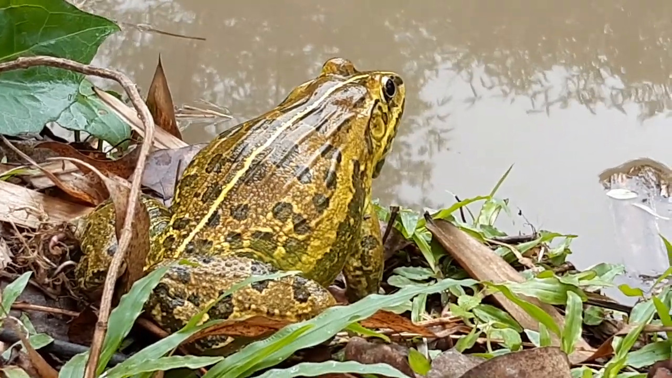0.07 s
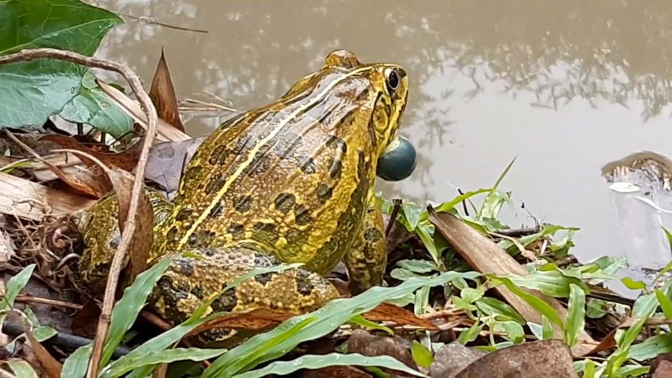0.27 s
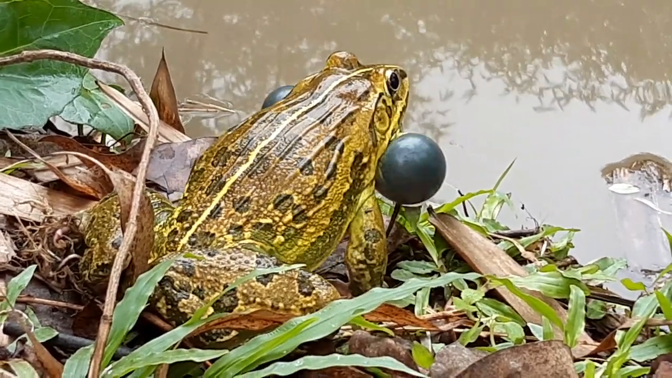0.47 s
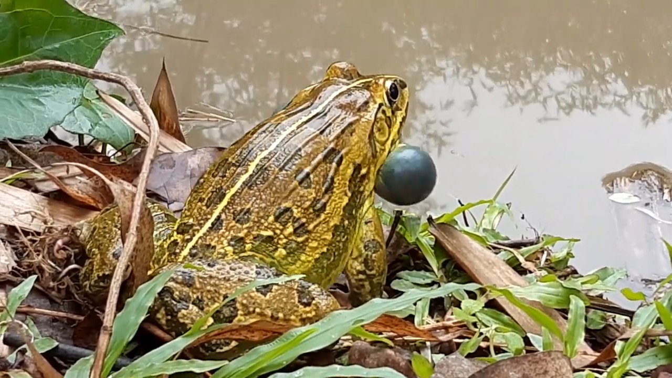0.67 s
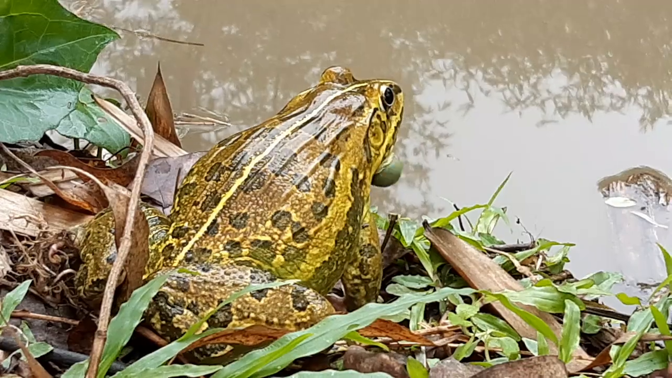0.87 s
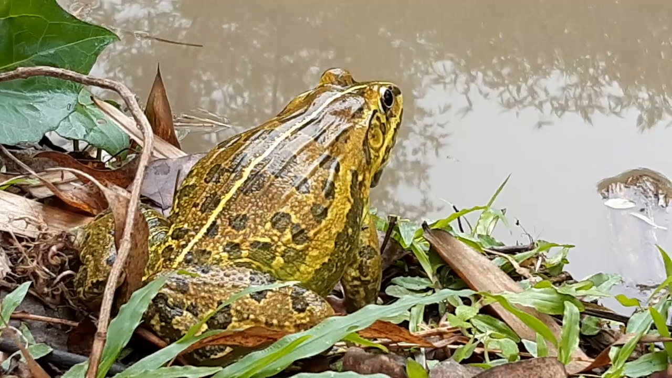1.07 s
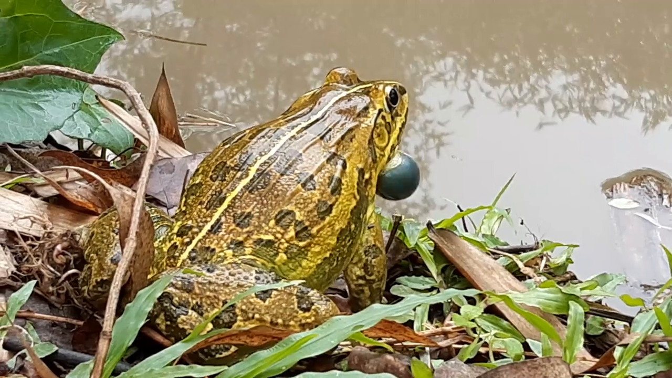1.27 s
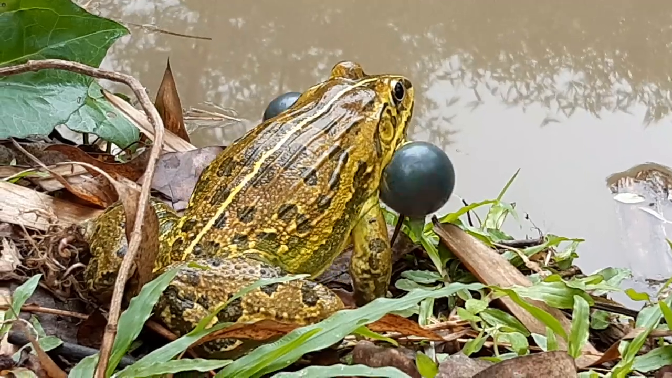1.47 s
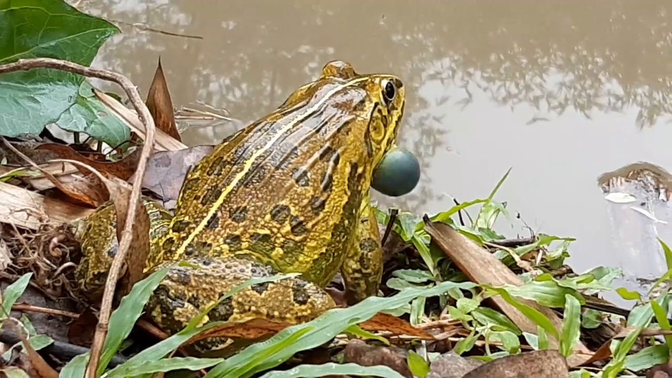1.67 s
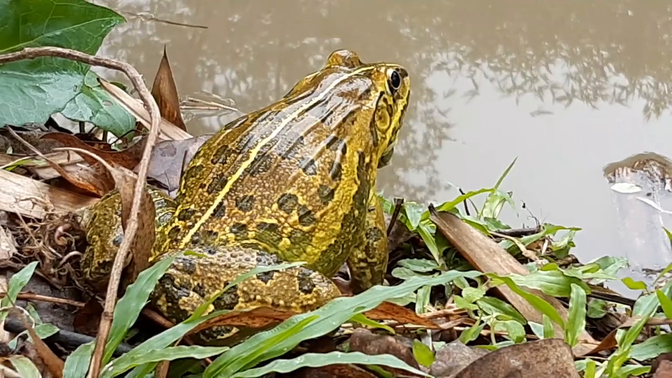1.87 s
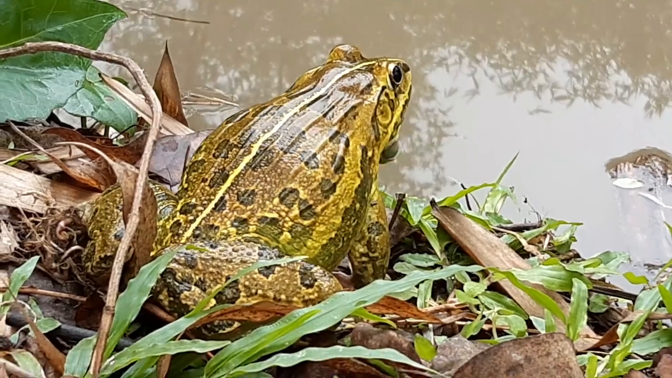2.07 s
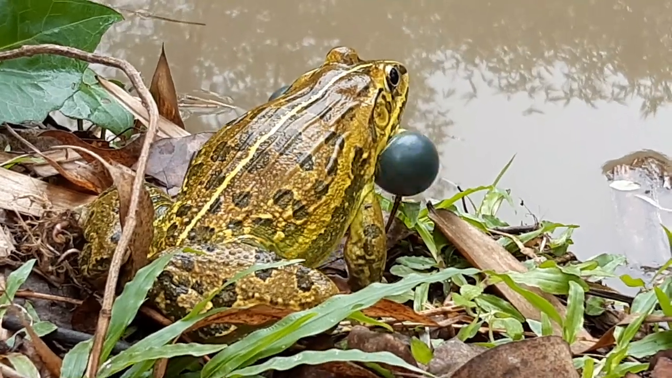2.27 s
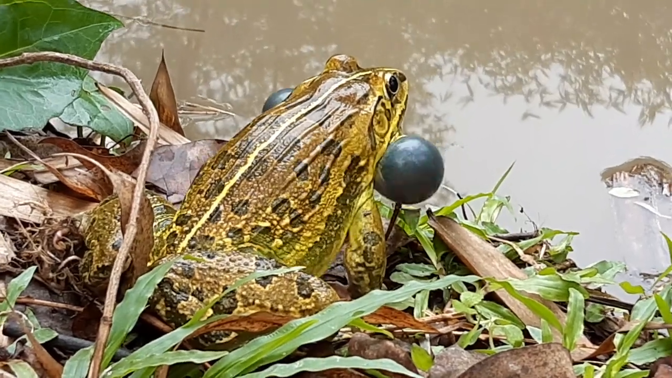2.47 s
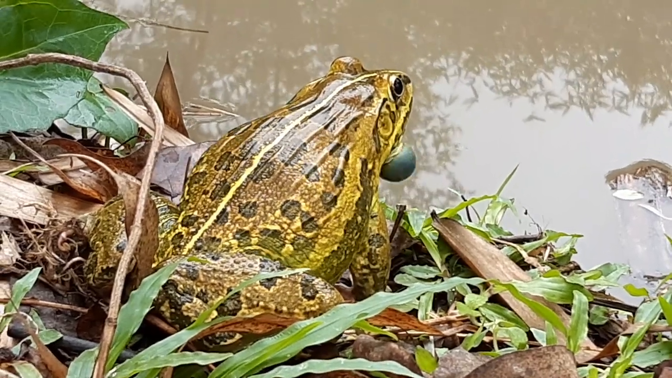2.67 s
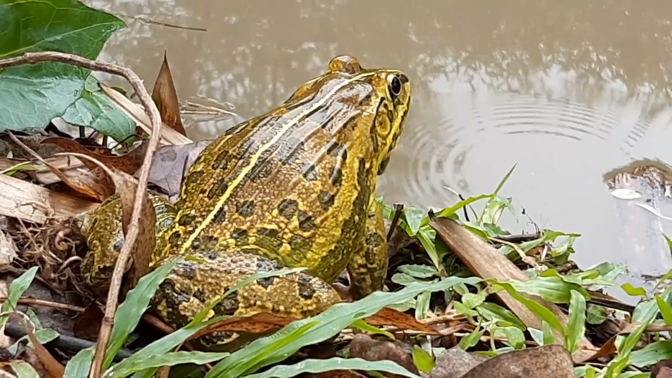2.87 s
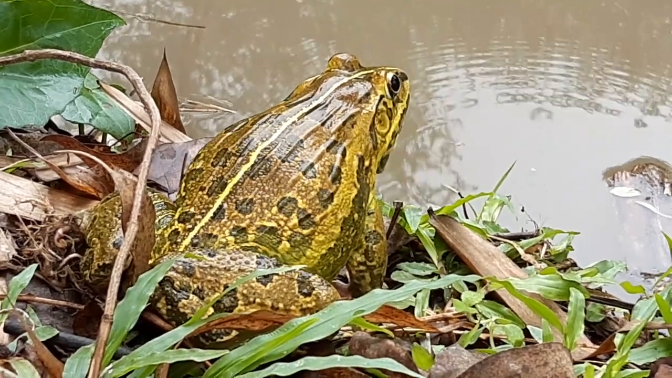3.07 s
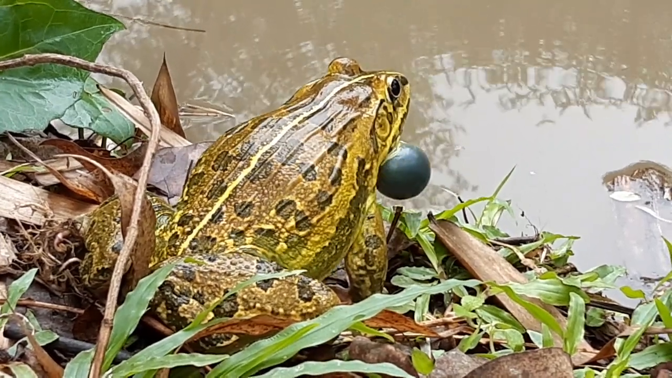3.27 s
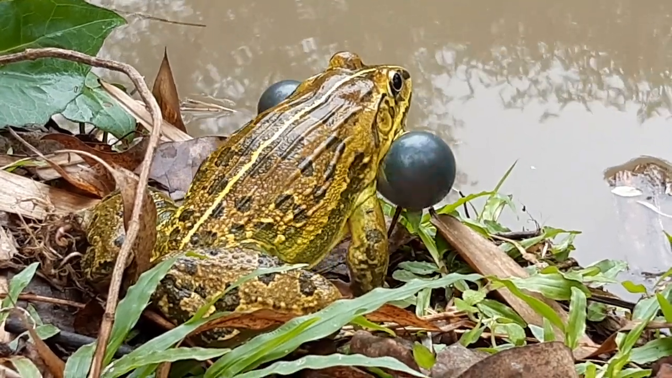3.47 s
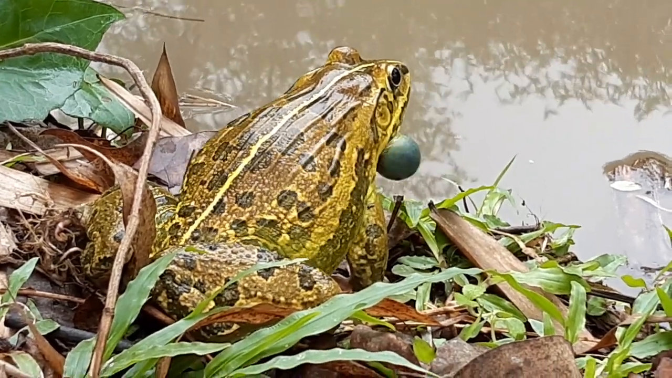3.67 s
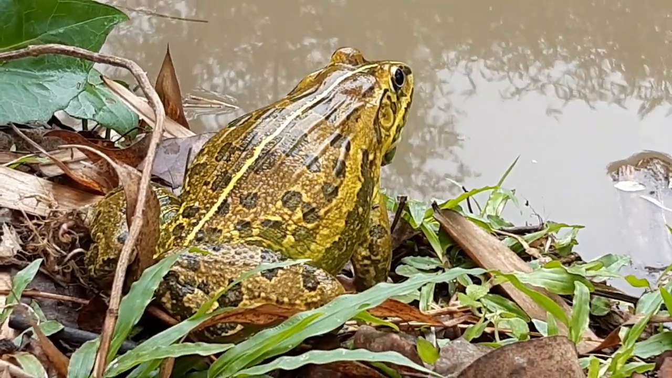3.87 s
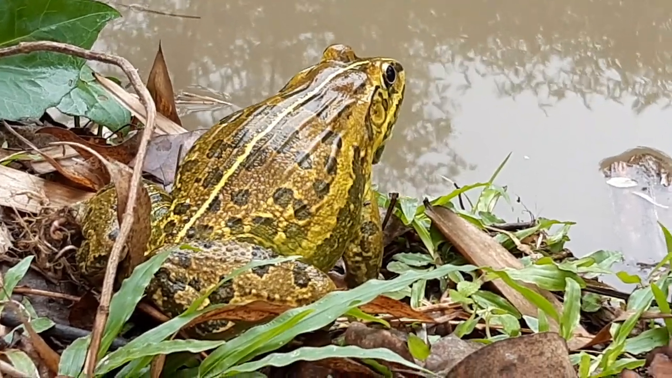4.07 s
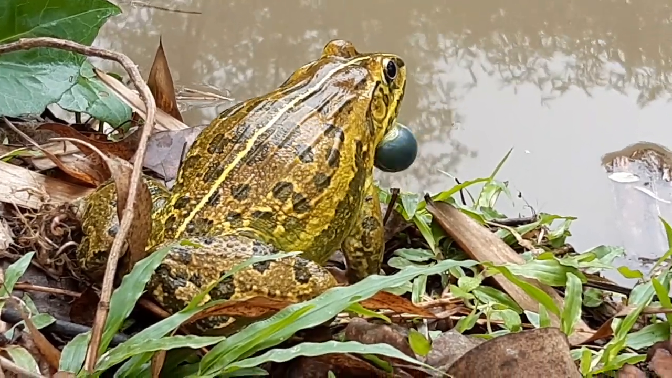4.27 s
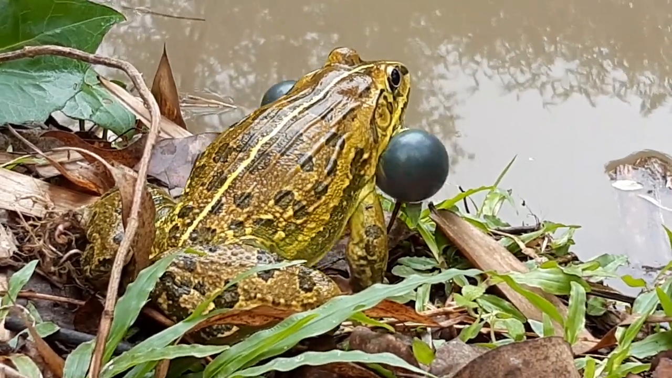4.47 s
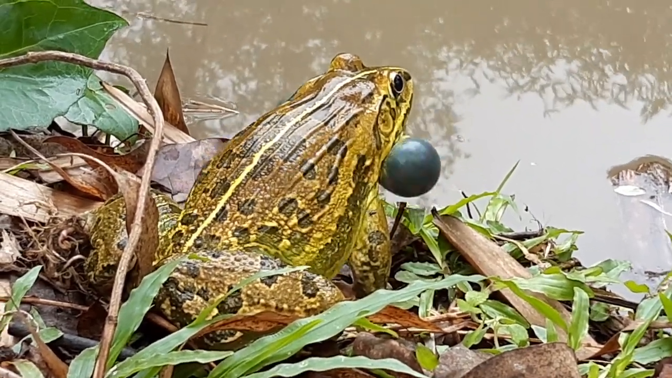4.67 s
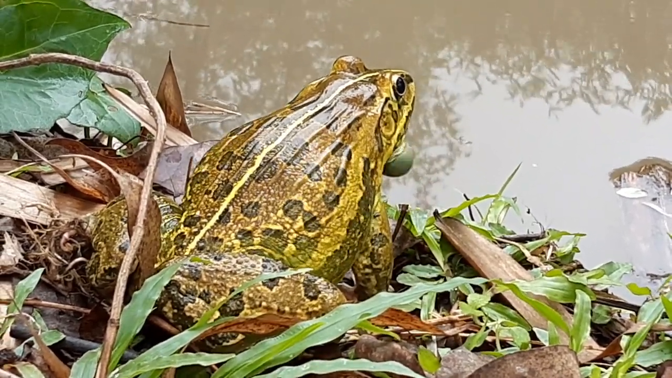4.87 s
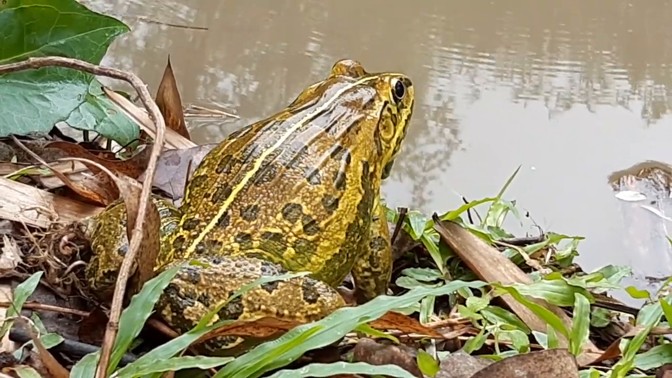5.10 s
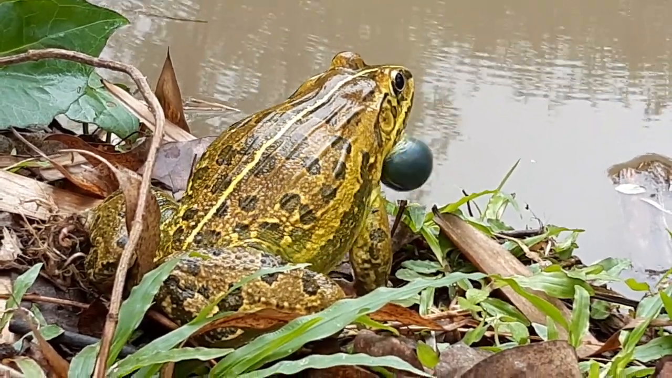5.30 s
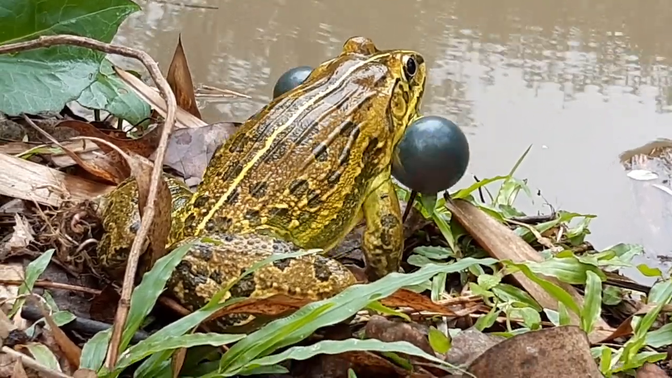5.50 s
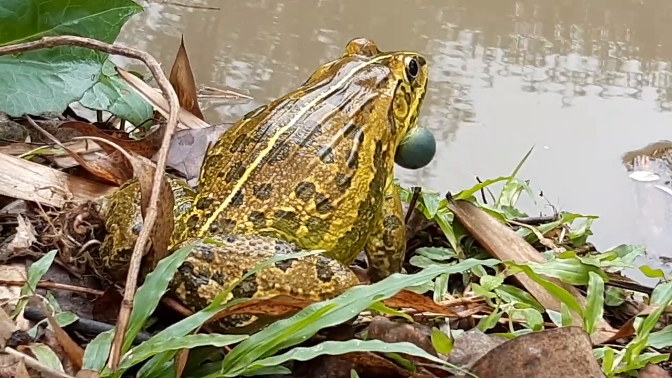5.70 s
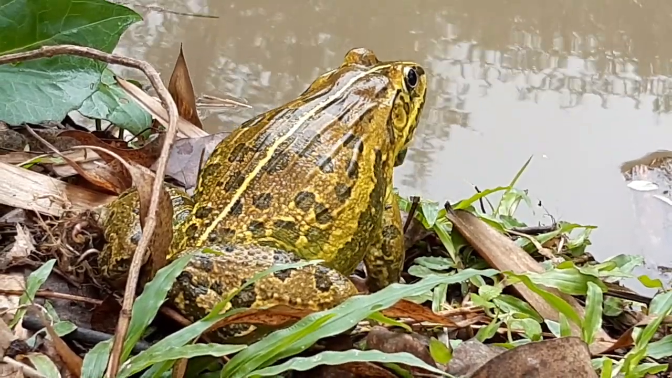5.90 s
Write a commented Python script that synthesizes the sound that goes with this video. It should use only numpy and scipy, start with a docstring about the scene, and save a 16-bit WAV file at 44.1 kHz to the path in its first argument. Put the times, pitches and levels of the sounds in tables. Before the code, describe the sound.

At a pond edge, a large frog sits close to a stereo microphone and croaks loudly six times, starting near 0.3, 1.25, 2.15, 3.2, 4.25 and 5.25 seconds. Each croak lasts about a third of a second: a fast roll of some seventy pulses per second, throaty around 500 hertz with a bright, nasal ring near 1.4 kilohertz, swelling quickly, slowing slightly and ending short. Much fainter frogs answer in the gaps, at the start, near 1, 2, 2.6-3.2, 3.8-4.2, 4.9-5.2 and after 5.5, over a hazy, pulsing distant chorus. A bird squeals briefly at 1.2, between 1.9 and 2.65, at 4.7 and 5.1, with small hisses around 1.1-1.5 and 3. Far echoing whistles chirp at 0.1, 1.65-1.9 and 3.35-3.65. Thin leafy rustle continues quietly; low soft wind bumps grow slightly after 4.8.

```python
"""A large frog croaks close by at the edge of a pond; neighbours and a distant chorus answer across the water.
Each croak is a roll of glottis openings; in each, the vocal cords snap shut a few times and ring throat and sacs.
A bird squeals in swept partials and hisses in shaped noise; another whistles far off, mostly through echoes.
Filtered noise makes a thin rustle and light wind on the two microphone ports."""
import sys
import numpy as np
from scipy import signal
from scipy.fft import rfft, irfft, next_fast_len
from scipy.io import wavfile
from scipy.ndimage import uniform_filter1d, map_coordinates

SR = 44100
rng = np.random.default_rng(int(sys.argv[2]) if len(sys.argv) > 2 else 0)


def unload_audio(sound):
    """Save the sound as a 16-bit wav file, at the path given as the first command line argument."""
    columns = np.transpose(np.atleast_2d(sound))
    # keep every value between -1 and 1, then stretch to whole-number steps
    steps = np.round(np.clip(columns, -1, 1) * 32767)
    wavfile.write(sys.argv[1], SR, steps.astype(np.int16))


N = 261954
TIME = np.arange(N) / SR

# croaks of the near frog: (first opening [s], time to the last opening [s], relative effort [dB])
NEAR_CROAKS = [(0.2952, 0.3357, 0), (1.251, 0.33, 0), (2.1408, 0.3227, 0), (3.1976, 0.34, 0),
               (4.2627, .3543, 0), (5.234, 0.32, 0)]
# resonances of the swelling sacs at normal size: (frequency [Hz], relative level [dB], t60 [s])
SAC_MODES = [(1550, -4.5, 0.014), (1345, -5, 0.0098)]
# likeness of left and right in diffuse sound: (frequency [Hz], correlation [-1 to 1])
DIFFUSE_LIKENESS = [(60, 0.56), (130, 1), (290, 0.99), (640, -0.28), (1410, -0.55), (3100, 0.25),
                    (6820, -0.39), (15000, 0.67)]


def amp(db):
    """Amplitude gain is the antilogarithm of a twentieth of the decibels."""
    return 10 ** (np.asarray(db) / 20)


def unit(x):
    """Normalisation to equal mean power: rms 1."""
    return x / np.sqrt(np.mean(x ** 2) + 1e-20)


def along(points, hz):
    """Interpolation of (frequency [Hz], value) points on a logarithmic frequency axis."""
    f, v = np.transpose(points)
    return np.interp(np.log(hz + 1), np.log(f + 1), v)


def level(rows, column=1):
    """An envelope linear in decibels, as gain per sample; practically silent outside the rows."""
    rows = np.array(rows)
    return amp(np.interp(TIME, rows[:, 0], rows[:, column], left=-200, right=-200))


def bursts(rows, rise_db_s, fall_db_s):
    """Exponential rise, hold and decay; the powers of the (start [s], hold [s], level [dB]) rows add."""
    power = 0
    for s, hold, db in rows:
        before = np.maximum(s - TIME, 0)
        after = np.maximum(TIME - s - hold, 0)
        power = power + amp(db - rise_db_s * before - fall_db_s * after) ** 2
    return np.sqrt(power)


def wobble(rate):
    """Band-limited random modulation: a smooth curve through rate random knots a second."""
    return map_coordinates(rng.standard_normal(int(N * rate / SR) + 4), [TIME * rate])


def filtered(x, response):
    """Linear filtering: the spectrum is multiplied by a complex response of frequency."""
    m = next_fast_len(N + SR // 2)
    return irfft(rfft(x, m) * response(np.fft.rfftfreq(m, 1 / SR)), m)[..., :N]


def placed(x, side, lead):
    """Localisation by interchannel level and phase differences, shared equally by the two ports."""
    half = lambda hz: amp(along(side, hz) / 2) * np.exp(.5j * along(lead, hz))
    return filtered(x, lambda hz: np.array([half(hz), 1 / half(hz)]))


def rush(spectrum, alike, patchy_db):
    """Coloured stereo noise of rms 1: mid-side mixing sets coherence, random gain makes patches."""
    z = signal.stft(rng.standard_normal((2, N + 512)), nperseg=512)[2]
    field = rng.standard_normal(z.shape[1:])
    field = uniform_filter1d(uniform_filter1d(field, 6, 0), 8, 1)
    pair = signal.istft(z * amp(patchy_db * unit(field)), nperseg=512)[1][:, :N]
    # the correlation of the channels is the cosine of twice this angle
    turn = lambda hz: np.arccos(np.clip(along(alike, hz), -1, 1)) / 2
    colour = lambda hz: amp(along(spectrum, hz)) * [np.cos(turn(hz)), np.sin(turn(hz))]
    mid, side = filtered(pair, colour)
    return unit(np.array([mid + side, mid - side]))


def echoes(x):
    """Diffuse reverberation: frequency-dependent decay of scattered noise, a new tail every fifth of a second."""
    # reverberation of banks and trees: (frequency [Hz], t60 [s])
    pond_decay = [(300, 0.38), (1600, 0.598), (3400, 0.632), (9000, 0.61)]
    out, step = np.zeros((2, N + SR)), SR // 5
    for start in range(0, N, step):
        hz, t, z = signal.stft(rng.standard_normal((2, SR // 2)), SR, nperseg=256)
        decay = amp(-60 * t / along(pond_decay, hz)[:, None])
        tail = signal.istft(z * decay, SR, nperseg=256)[1]
        wet = signal.fftconvolve(x[None, start:start + step], tail / np.linalg.norm(tail[0]), axes=1)
        out[:, start:start + wet.shape[1]] += wet
    return out[:, :N]


def ring(modes, t, tuning, soft=0):
    """Modal decay after an impulse at t = 0; tuning scales the pitch, soft [s] rounds the start."""
    t = np.maximum(t, 0)
    rise = 1 - np.exp(-(t / (soft + 1e-9)) ** 2)
    return rise * sum(amp(db - 60 * t / t60) * np.sin(2 * np.pi * hz * tuning * t) for hz, db, t60 in modes)


def croak(opens, rows, sac_tuning, scatter_db, jitter):
    """Source-filter voice: cord snaps in each glottis opening excite throat, sacs and head resonances."""
    # snaps of one opening, growing to the main one, then a weaker last one:
    # (delay from the main snap [cord cycles; the last row a share of its delay], relative size [dB],
    # width with taut cords at normal sac size [s], relative blow on the sacs [dB])
    snaps = [(-3, -17, .0002, -39), (-1.87, -5.5, .00018, -21.5), (-0.8152, -1.5, 0.00016, -10),
             (0.09, 0.32, 0.00013, 0.52), (1.38, -10.5, 0.00015, -10)]
    # throat at a cord rate of 520 Hz: (frequency [Hz], relative level [dB], t60 [s])
    throat = [(392.7, -8, 0.023), (1012, -13, 0.012), (768, -14.5, 0.017)]
    # faint upper resonances of the head: (central frequency [Hz], relative level [dB], t60 [s])
    head_modes = [(3237, -35, 0.028), (2710, -34.5, .013), (3830, -37.5, 0.014)]
    s, *columns = np.transpose(rows)
    chance = rng.standard_normal((len(opens), 2 + len(snaps)))
    opens = (opens + jitter * chance[:, 0])[:, None]
    cord_hz, effort_db, slack, sacs_db, last, filling = (np.interp(opens, s, c) for c in columns)
    samples = np.floor(opens * SR).astype(int) + np.arange(-SR // 100, SR // 45)
    # the rasp is strongest when a croak has just swollen
    peak_s, spread_s = 0.1515, .09
    rasp = .35 + np.exp(-.5 * ((opens - opens[0] - peak_s) / spread_s) ** 2)
    head_tuning = 1 + 0.0083 * chance[:, -1:]
    body, head = 0, 0
    for k, (cycle, size_db, width, strike_db) in enumerate(snaps):
        stretch = last if k == len(snaps) - 1 else 1
        t = samples / SR - opens - cycle * stretch / cord_hz
        size = amp(effort_db + 18.5 + scatter_db * chance[:, 1 + k:2 + k])
        dip = np.exp(-.5 * (t * np.sqrt(sac_tuning) / (width * np.abs(slack))) ** 2)
        blow = size * amp(strike_db + sacs_db)
        body += size * amp(size_db) * (ring(throat, t, cord_hz / 520) - dip)
        body += blow * ring(SAC_MODES, t, filling * sac_tuning)
        head += blow * rasp * ring(head_modes, t, head_tuning, soft=0.0017)
    heard = samples >= 0
    body, head = (np.bincount(samples[heard], part[heard], N + SR)[:N] for part in (body, head))
    # a frog is too small to radiate low notes, and its soft skin swallows high ones
    low_cut = lambda hz: 1 + (327 * np.sqrt(sac_tuning) / (hz + 1)) ** 14
    high_cut = lambda hz: 1 + (hz / (1846 * sac_tuning)) ** 16
    skin = lambda hz: 1 / np.sqrt(low_cut(hz) * high_cut(hz))
    # a narrow dip in the croak's spectrum near 630 Hz
    dip_630 = lambda hz: 1 - 0.43 * np.exp(-((hz - 630) / 80) ** 2)
    return filtered(body, lambda hz: skin(hz) * dip_630(hz)) + head


def neighbours():
    """Propagation over water: answering frogs lose a band to the bounce and partly arrive as echo."""
    # calls: (first opening [s], length [s], mean opening rate [Hz, approximate], cord rate [Hz],
    # main sac pitch when normally filled [Hz], relative effort [dB], relative sac level [dB],
    # left-right level [dB], echoed share of power [0-1, held to 0.45 at most])
    calls = [ (-0.0445, .285, 77.76, 520, 2070, -36.5, -1, 2, 0.45),
             (0.963, 0.32, 71.77, 492, 2176, -40, -4, -4, 1),
             (1.96, 0.29, 73.62, 485.7, 2070, -42.5, -5.5, -5, 0.555),
             (2.622, 0.15, 66.6, 464.6, 1900, -49.5, 2.5, 1.5, 0.3),
             (2.781, 0.2, 70.53, 512, 2200, -39.5, -3.5, -3, 0.68),
             (2.919, .28, 67.26, 465.2, 1770, -42, 5, -2, 0.17),
             (3.793, 0.25, 67.33, 467.8, 1720, -38.5, 4, -3, 0.37),
             (3.962, 0.22, 79.85, 530.6, 2170, -38, 0.5, 4, 0.22),
             (4.868, 0.27, 66.64, 469, 1685, -39, 2.5, -1, 0.3),
             (4.96, .28, 74.67, 558, 2186, -37.5, 2, 0, 0.326),
             (5.548, 0.1616, 71.28, 469.5, 1801, -41, 2, 8.5, 0.6),
             (5.829, 0.21, 65.1, 475, 1695, -39, 1.5, 0, 0.24), ]
    # the low body note carries well over water: (centre [Hz], width [Hz], gain of the added resonance [dB])
    hollow = (529, 80, 4)
    near, far = np.zeros((2, N)), np.zeros(N)
    for s, length, rate_hz, cord_hz, sac_hz, db, sacs_db, pan_db, share in calls:
        beats = np.arange(int(length * rate_hz) + 1) / rate_hz
        opens = s + beats * (.97 + .03 * beats / length)  # slows down along the call
        # (part of call [0-1], relative effort [dB], sac pitch [share of normal])
        shape = [(0, -12.5, .95), (.1, -3, 1.024), (.85, -5, 1.003), (1, -12.5, 1.0)]
        rows = [(s + part * length, cord_hz, db + swell_db, 1.1, sacs_db, 1.2, filling)
                for part, swell_db, filling in shape]
        voice = croak(opens, rows, sac_hz / SAC_MODES[0][0], scatter_db=.9, jitter=.00008)
        share = np.clip(share, 0, .45)
        near += voice * amp([[pan_db / 2], [-pan_db / 2]]) * np.sqrt(1 - share)
        far += voice * np.sqrt(share)
    # the bounce off the water weakens a band of the direct sound
    bounce = lambda hz: 1 - 0.83 * np.exp(-((hz - 950) / 420) ** 2)
    centre, width, gain_db = hollow
    resonance = lambda hz: 1j * hz * width / (centre ** 2 - hz ** 2 + 1j * hz * width)
    carry = lambda hz: bounce(hz) * (1 + amp(gain_db) * resonance(hz))
    return filtered(near + echoes(far), carry)


def chorus():
    """Incoherent summation: frogs too far to tell apart merge into modulated, coloured noise."""
    # swells: (time [s], central level [dB])
    swells = [(0, -41), (.21, -44.5), (.6, -45), (.82, -67.5), (1.03, -61), (1.19, -39), (1.56, -45),
              (1.78, -60.5), (2.0, -59.5), (2.13, -37), (2.44, -48.5), (2.73, -45.5), (3.11, -41),
              (3.6, -56.5), (3.86, -44.5), (3.98, -38), (4.13, -50.5), (4.8, -48.5), (4.94, -43),
              (5.54, -35), (5.65, -44), (5.94, -49.5)]
    # (frequency [Hz], relative level per Hz [dB])
    colour = [(120, -69.5), (200, -32), (377, -1.5), (443, -8), (486, -2.5), (1340, -9), (1450, -1),
              (1970, -6.5), (2230, -8.5), (2960, -11.5), (5000, -28.5), (6500, -46.5), (11000, -120)]
    return level(swells) * amp(2.0 * wobble(12)) * rush(colour, DIFFUSE_LIKENESS, patchy_db=4.5)


def rustle():
    """Stationary broadband noise: a thin rustle of leaves and distant insects."""
    # (frequency [Hz], relative level per Hz [dB])
    colour = [(88, -33), (150, -7.5), (290, -3.5), (491, 1.5), (950, -29.5), (1640, 5), (2560, -25.5),
              (4670, -18), (7310, -14), (8370, -18), (11000, -20), (15600, -28.5)]
    return amp(-57) * rush(colour, DIFFUSE_LIKENESS, patchy_db=-1.0)


def wind():
    """Turbulent pressure: low noise buffets the two ports partly independently, in breeze and gusts."""
    # (time [s], hold [s], relative level [dB])
    gusts = [(.38, .01, -59.5), (2.05, 0.126, -63.5), (2.5, 0.0285, -66), (2.96, .01, -53),
             (3.26, .01, -54.5), (3.62, 0.011, -51), (4.1, .01, -53), (4.35, .03, -57.5), (4.81, .005, -47),
             (4.9, 0.026, -43.5), (5.13, .005, -46), (5.28, 0.0049, -49), (5.48, 0.013, -46.5),
             (5.77, 0.18, -47)]
    # (frequency [Hz], relative level per Hz [dB])
    rumble = [(12, -45.5), (25, -26), (60, -2.5), (135, -6), (155, -11.5), (179, -15), (260, -23),
              (340, -36), (570, -120)]
    lumps = amp(3.5 * np.array([wobble(14), wobble(7.9)]))
    buffeting = unit(lumps * rush(rumble, [(60, .2), (200, 0.61)], patchy_db=2.5))
    breeze = amp(-70 + 3 * wobble(3.3))
    return (breeze + bursts(gusts, rise_db_s=200.5, fall_db_s=250)) * buffeting


def squealing_bird():
    """Harmonic synthesis of gliding squeals, with turbulent noise for hisses and breath."""
    # each squeal a list of: (time [s], central pitch [Hz], relative level [dB])
    squeals = [
        [(1.225, 1979, -51.5), (1.238, 2009, -35.5), (1.26, 2127, -32), (1.29, 2050, -36.5), (1.305, 1970, -52)],
        [(1.925, 1660, -65), (1.969, 2010, -37.5), (1.999, 2137, -36.5), (2.061, 2167, -34.5),
         (2.097, 2260, -39), (2.165, 2283, -37.5), (2.215, 2203, -45)],
        [(2.385, 2022, -67), (2.405, 2257, -52.5), (2.476, 2236, -38), (2.484, 1934, -36.5), (2.517, 1927, -41),
         (2.583, 1480, -38), (2.655, 1378, -52)],
        [(4.69, 1690, -55), (4.712, 2225, -32.5), (4.752, 2289, -34.5), (4.844, 2110, -33),
         (4.908, 2058, -40.5), (4.945, 1990, -51)],
        [(5.118, 1890, -54.5), (5.14, 2139, -32.5), (5.222, 2317, -34.5), (5.304, 2133, -34),
         (5.33, 1799, -57.5)],
    ]
    # voice of each squeal: (first partial [dB], its fading [dB/s], second partial [dB], upper partials [dB],
    # top partials [dB], fading of upper and top [dB/s], pitch flutter [share of pitch]); levels are relative
    voices = [(0, -2, -30.5, -36, -30.5, -2, 0.01), (2, 35.5, -19, -30, -23.5, 0, .002),
              (5.5, 151, 0, -10, -23, 89, 0.01), (-10.5, 0, 0, -13, -24, 3.5, 0.01),
              (-3, 200, 0, -14.5, -24, 0, 0.01)]
    # upper and top partials: (partial number, relative level [dB])
    upper_partials = [(3, 1), (4, 1)]
    top_partials = [(5, 4), (6, 5.5), (7, -20)]
    # (time [s], hold [s], relative level [dB])
    hisses = [(.104, .005, -54), (1.12, .015, -45), (1.195, .01, -46.5), (1.28, 0.042, -49.5),
              (1.52, 0.025, -50.5), (2.975, .02, -45), (3.05, 0.014, -44), (3.17, .045, -46.5),
              (3.32, .17, -57.5)]
    # (frequency [Hz], relative level per Hz [dB])
    hiss_colour = [(2060, -27.5), (3500, 2), (4550, -2.5), (6030, 3), (7180, -1.5), (9220, -6.5),
                   (12300, -6), (14000, -6.5), (15600, -25.5)]
    # the body around the microphones shades each port: (frequency [Hz], left-right level [dB])
    bird_side = [(60, -4.5), (110, -2), (200, 7.5), (380, 1.5), (700, 1.5), (1290, -12), (2380, -4),
                 (4400, -10.5), (8120, 9.5), (15000, 13.5)]
    # (frequency [Hz], phase lead of left over right [rad])
    bird_lead = [(100, .01), (2300, 1.02), (4400, .3), (6500, -.1), (8500, -2), (11000, 0.47),
                 (14000, 0.21)]
    voice = np.zeros(N)
    for rows, settings in zip(squeals, voices):
        first_db, fading_db, second_db, upper_db, top_db, dulling_db, rough = settings
        s, hz = np.transpose(rows)[:2]
        glide = uniform_filter1d(np.interp(TIME, s, hz), size=350)
        phase = 2 * np.pi * np.cumsum(glide * (1 + rough * wobble(300))) / SR
        upper, top = (sum(amp(db + 0.93 * wobble(44)) * np.sin(k * phase) for k, db in group)
                      for group in (upper_partials, top_partials))
        elapsed = np.abs(TIME - s[0])
        tones = amp(first_db - fading_db * elapsed) * np.sin(phase)
        tones += amp(second_db) * np.sin(2 * phase)
        tones += amp(-dulling_db * elapsed) * (amp(upper_db) * upper + amp(top_db) * top)
        voice += np.sqrt(2) * amp(1.5 * wobble(60)) * level(rows, column=2) * tones
    puffs = bursts(hisses, rise_db_s=403, fall_db_s=130) * amp(wobble(70))
    # breath leaks around each squeal
    puffs += amp(-23.5) * np.sqrt(np.abs(uniform_filter1d(voice ** 2, size=3000)))
    hiss = puffs * rush(hiss_colour, [(5000, 0.47)], patchy_db=2.5) * amp([[1.8], [-1.8]])
    return placed(voice, bird_side, bird_lead) + amp(-4.5) * echoes(voice) + hiss


def whistling_bird():
    """Frequency-modulated sines in a reverberant field: short husky far notes, mostly echo."""
    # (start [s], length [s], central start pitch [Hz], central end pitch [Hz], relative level [dB])
    notes = [ (0.105, 0.038, 3520, 3130, -36), (0.143, 0.027, 2576, 2380, -38),
             (1.65, 0.044, 3390, 3140, -40), (1.685, 0.0275, 2430, 2305, -38),
             (1.81, 0.04, 2650, 2716, -41.5), (1.854, 0.041, 3057, 3170, -36.5),
             (1.887, 0.046, 3335, 3420, -35), (3.349, 0.05, 3366, 3313, -34.5),
             (3.535, 0.024, 2630, 2650, -35), (3.565, 0.036, 3140, 3099, -32),
             (3.607, 0.041, 3506, 3290, -27.5), ]
    voice, flutter, throb = np.zeros(N), wobble(400), amp(4 * wobble(90))
    for s, length, start_hz, end_hz, db in notes:
        part = np.arange(int(length * SR)) / (length * SR)
        husk = 1 + .025 * flutter[round(s * SR):][:len(part)]
        phase = 2 * np.pi * np.cumsum((start_hz + (end_hz - start_hz) * part) * husk) / SR
        voice[round(s * SR):][:len(part)] += amp(db) * np.sin(np.pi * part) * np.sin(phase)
    return 0.43 * voice * throb + amp(-2.5) * echoes(voice * throb)


def cord_breath(voice):
    """Turbulence follows flow change: air forced past the cords puffs treble with each snap."""
    # (frequency [Hz], relative level per Hz [dB])
    sheen = [(2500, -30), (3500, 0.5), (5000, -5.5), (6500, -5.5), (9000, -5), (13000, -1), (15500, 0)]
    slope = np.gradient(voice)
    puffs = np.sqrt(np.abs(uniform_filter1d(slope ** 2, size=60))) / np.abs(slope).max()
    return amp(-42.5) * puffs * rush(sheen, [(8000, .6)], patchy_db=4.5)


def frog():
    """Pulse-train phonation: openings come quickest when fully swollen, then slow to a late last one."""
    # every croak swells and dies alike: (time after the start [s], relative time between openings,
    # cord rate [Hz], relative effort [dB], slackness of the cords [1-2], relative sac level [dB],
    # stretch of the last snap's delay, sac pitch [share of normal: rises as they fill and tighten])
    swell = [(0, 14.7, 390, -50, 1.97, -19.5, .93, .55), (.042, 14.5, 428, -32.5, 1.45, -9, .94, .71),
             (.064, 14.3, 472, -25.5, 1.3, -4.5, .95, .88), (.085, 14.1, 503, -21.5, 1.17, -3, .96, .97),
             (.125, 14.0, 516, -18.5, 1.1, -1.3, 1.066, 0.993),
             (0.169, 14.1, 514, -18.9, 1.12, -1.9, 1.12, 1.003),
             (.21, 14.35, 510.3, -19.5, 1.18, -0.46, 1.28, 1.016)]
    # the same columns, but the first is time before the end [s]
    fade = [(.065, 15.0, 500, -20, 1.18, -1.04, 1.32, 1.037),
            (.018, 15.4, 489.7, -23, 1.3, -0.2, 1.243, 1.056),
            (0.0021, 17.5, 437, -33, 1.6, -6.5, 1.25, 1.05)]
    # (frequency [Hz], left-right level [dB])
    frog_side = [(200, 1), (400, .4), (1300, 0), (2400, 1.5), (4400, 3)]
    # (frequency [Hz], phase lead of left over right [rad])
    frog_lead = [(100, .01), (700, 0.21), (1700, 0.75), (2500, 0.16), (3500, 0.48)]
    mean_period_s = .01465
    voice = np.zeros(N)
    for s, length, db in NEAR_CROAKS:
        rising = [(s + t, *row) for t, *row in swell]
        dying = [(s + length - t, *row) for t, *row in fade]
        shape = np.array(rising + dying)
        even = np.linspace(s, s + length, round(length / mean_period_s) + 1)
        passed = np.cumsum(np.interp(even, shape[:, 0], shape[:, 1]))
        # the uneven spacing is scaled to fill the croak
        opens = s + length * (passed - passed[0]) / (passed[-1] - passed[0])
        rows = np.delete(shape, 1, axis=1)
        voice += amp(db) * croak(opens, rows, 1, scatter_db=.4, jitter=.00003)
    return placed(voice, frog_side, frog_lead) + amp(-21.5) * echoes(voice) + cord_breath(voice)


def sizzle():
    """A falling frequency sweep: a faint husky treble line sinks through the middle of each near croak."""
    middle_s, spread_s = .19, 0.055
    middle_hz, fall_hz_s = 12400, 14000
    t = TIME - middle_s - np.array(NEAR_CROAKS)[:, :1]
    t = t[np.abs(t).argmin(axis=0), np.arange(N)]  # time from the nearest croak's middle
    sinking_hz = middle_hz - fall_hz_s * np.clip(t, -.3, .3)
    phase = 2 * np.pi * np.cumsum(sinking_hz * (1 + .006 * wobble(500))) / SR
    return amp(-63 + 4 * wobble(70)) * np.exp(-.5 * (t / spread_s) ** 2) * np.sin(phase)


def scene():
    """Superposition: frogs, birds, background and a faint falling treble line in each croak add."""
    background = neighbours() + chorus() + rustle() + wind()
    birds = squealing_bird() + whistling_bird()
    return background + birds + frog() + sizzle()


def small_body(x):
    """First-order high-pass response: the microphone loses a little bass below 60 Hz."""
    return filtered(x, lambda hz: 1j * hz / (1j * hz + 60))


def record(dry):
    """Saturation and band limiting: the loudest peaks are held near a ceiling, the extreme treble cut."""
    top_hz = 15740
    clipped = small_body(dry) / (1 + np.abs(dry / 1.02) ** 40) ** (1 / 40)
    return filtered(clipped, lambda hz: hz < top_hz)


dry = scene()
out = record(dry)
unload_audio(out)
```